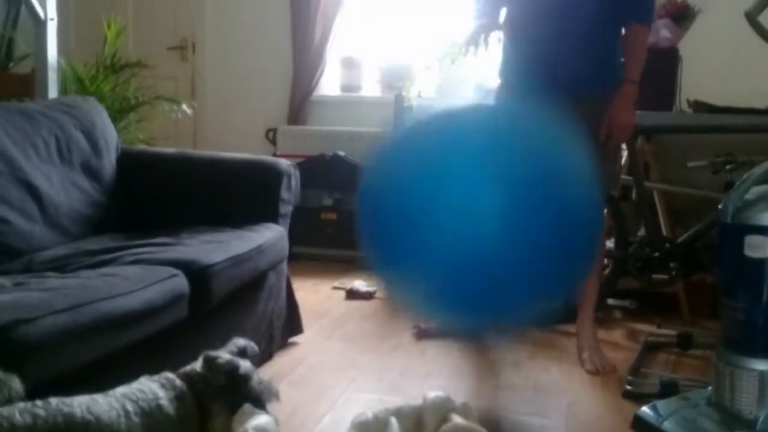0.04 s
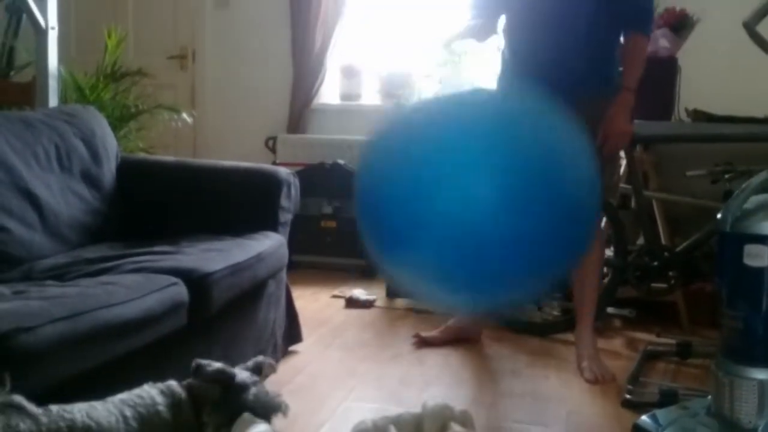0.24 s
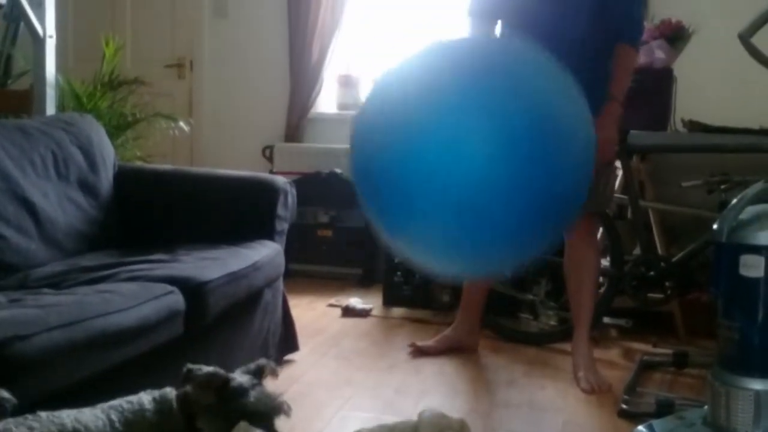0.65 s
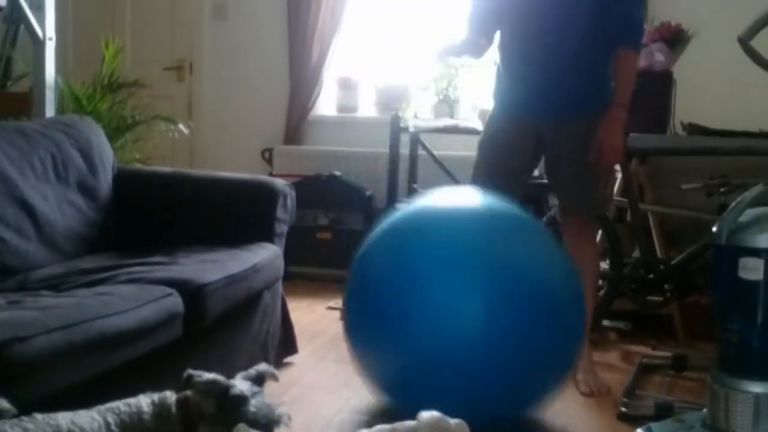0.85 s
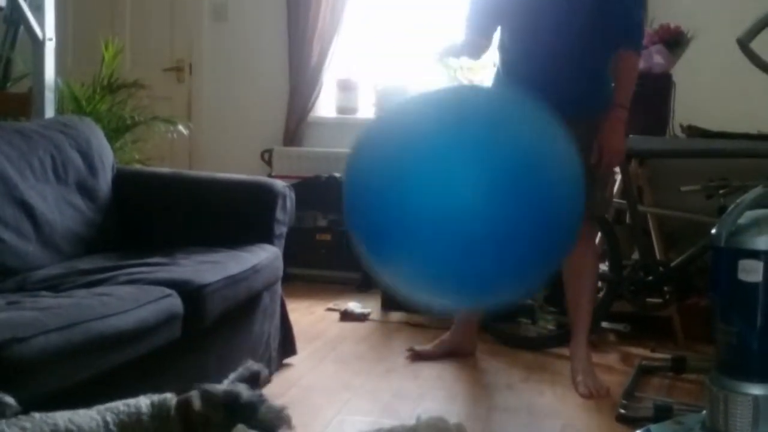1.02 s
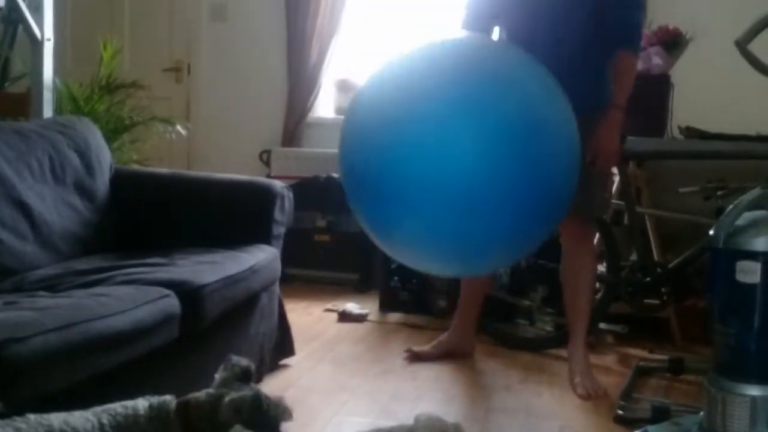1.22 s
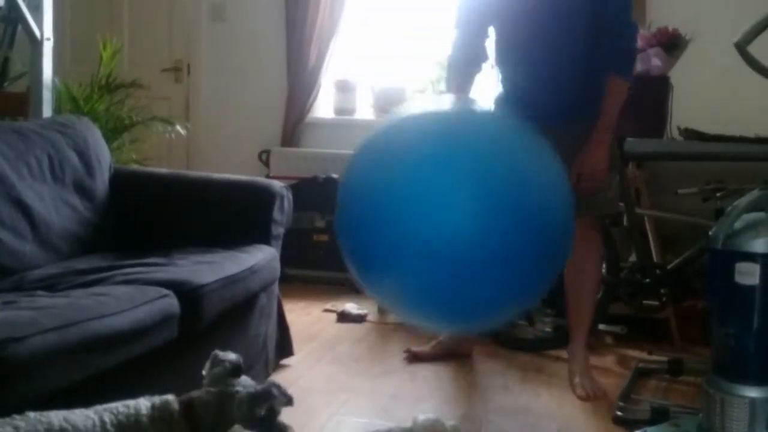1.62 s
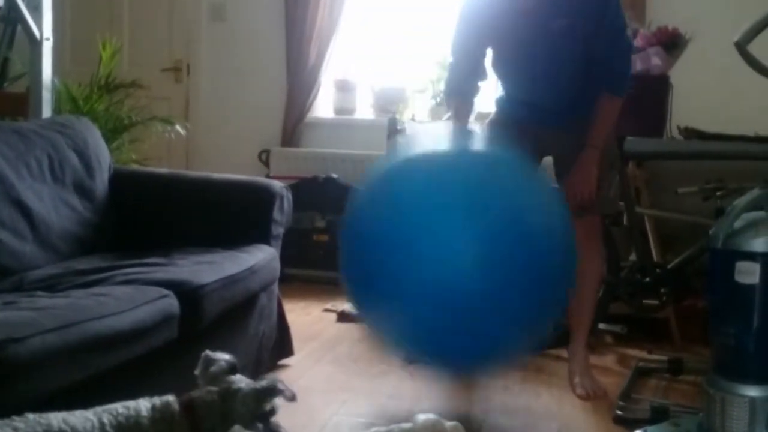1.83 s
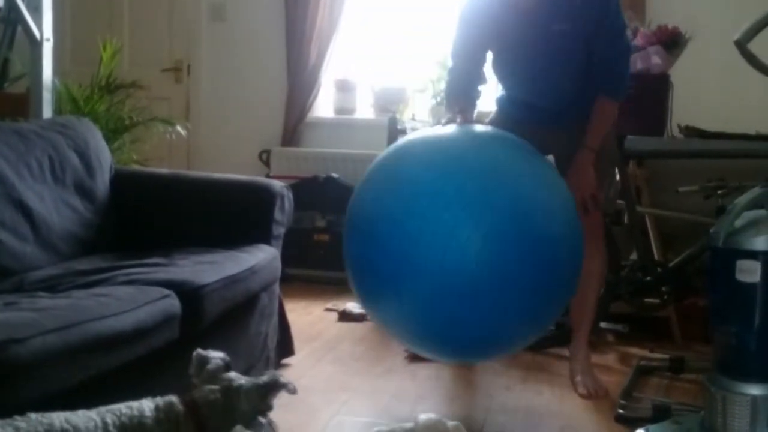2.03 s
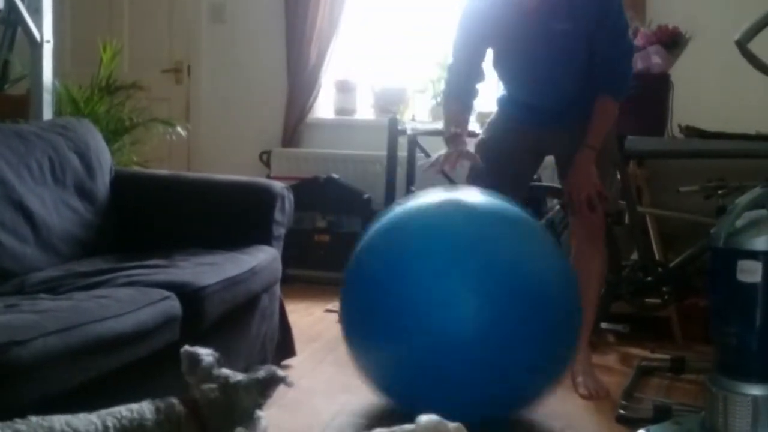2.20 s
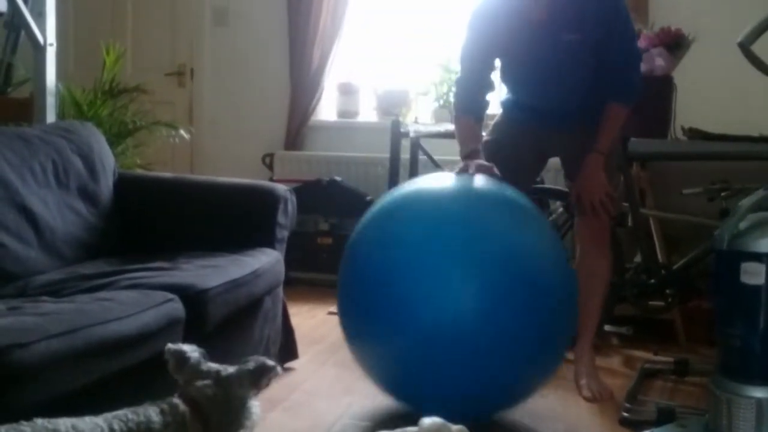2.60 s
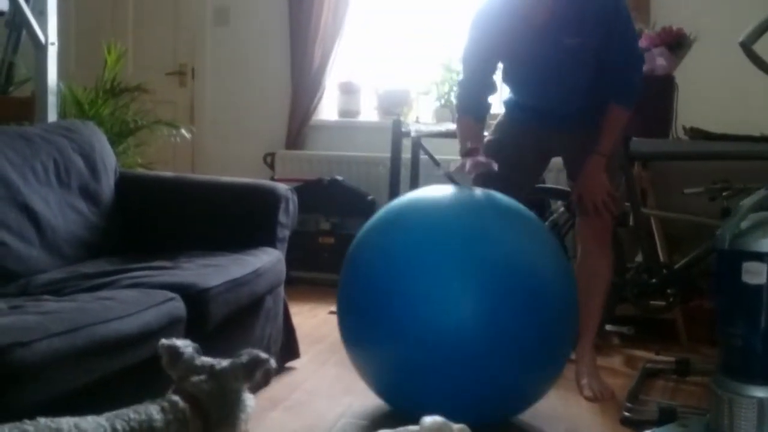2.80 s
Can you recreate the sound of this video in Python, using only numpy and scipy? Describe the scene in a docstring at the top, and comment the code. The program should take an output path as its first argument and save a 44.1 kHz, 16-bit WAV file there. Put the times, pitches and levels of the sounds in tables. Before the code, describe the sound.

A big rubber exercise ball bounces on a wooden floor, dribbled faster and faster.

```python
"""A big rubber exercise ball is dribbled on a wooden floor in a small, quiet living room.
At first an earlier bounce is still fading, with a faint rustle and a tick. Then the ball lands:
it slaps the boards, pushes a puff of air and sets the air inside it pinging. A hand pats it
back down with a duller thump, and the room answers every blow. As the dribble gets lower,
landings and pats come faster, and two more light ticks slip in near the end."""
import sys
import numpy as np
from scipy import signal
from scipy.fft import rfft, irfft
from scipy.io import wavfile

SR = 44100
rng = np.random.default_rng(int(sys.argv[2]) if len(sys.argv) > 2 else 0)


def to_wav(s):
    """Save 16-bit WAV."""
    ch = np.atleast_2d(s).T  # columns
    pcm = np.round(np.clip(ch, -1, 1) * 32767)  # PCM
    wavfile.write(sys.argv[1], SR, pcm.astype(np.int16))


N = 130095
T = np.arange(SR) / SR  # one second of time, for building single sounds


def amp(db):
    """Turns decibels into a number to multiply by."""
    return 10 ** (np.asarray(db) / 20)


def fade(fade_s):
    """Dies away by 60 dB in fade_s seconds."""
    return amp(-60 * T / fade_s)


def read(table, hz):
    """Looks up a pitch in a table, sliding between rows on a log scale."""
    pitches, values = np.transpose(table)
    return np.interp(np.log(hz + 1), np.log(pitches + 1), values)


def unit(sound):
    """Scales each channel to an energy of 1."""
    return sound / np.sqrt((sound ** 2).sum(-1, keepdims=True) + 1e-20)


def add(mix, start_s, sound):
    """Mixes a sound in; one that starts before zero leaves only its tail."""
    start = round(start_s * SR)
    sound = sound[..., max(-start, 0):]
    part = mix[:, max(start, 0):][:, :sound.shape[-1]]
    part += sound[..., :part.shape[1]]


def colour(sound, db_at, size=4096):
    """A tone control: turns each pitch up or down by db_at(hz)."""
    log_gain = np.log(amp(db_at(abs(np.fft.fftfreq(size, 1 / SR)))))
    response = np.exp(np.conj(signal.hilbert(log_gain)))  # nothing rings ahead of a blow
    taps = np.fft.ifft(response).real[:size // 2]
    return signal.fftconvolve(sound, taps[None], axes=1)[:, :sound.shape[1]]


# How alike left and right are: pitch_hz, likeness (0 to 1)
EAR_LIKENESS = [(60, 0.98), (200, .88), (500, 0.73), (1100, 0.058), (5000, 0), (14000, 0)]
def room_noise(samples):
    """Noise from all around, alike on both sides only at low pitches."""
    left, other = rfft(rng.standard_normal((2, samples)))
    likeness = read(EAR_LIKENESS, np.fft.rfftfreq(samples, 1 / SR))
    right = likeness * left + np.sqrt(1 - likeness ** 2) * other
    return irfft(np.array([left, right]), samples)


# The tone of the quiet room: pitch_hz, level_db
HUSH_TONE = [(20, 1), (40, -6.5), (70, -16.5), (130, -14), (220, -15.5), (400, -12), (600, -14),
             (1000, -13), (2000, -24.5), (3800, -24.5), (5000, -32.5), (6200, -31.5), (8000, -39.5),
             (12000, -44.5), (16000, -59.5)]
def room_hush(level_db=-65.5):
    """A faint, steady hush lies under everything."""
    spectrum = rfft(room_noise(N)) * amp(read(HUSH_TONE, np.fft.rfftfreq(N, 1 / SR)))
    return amp(level_db) * np.sqrt(N) * unit(irfft(spectrum, N))


# The tone of a hard landing: pitch_hz, level_db
SLAP_TONE = [(30, 23.5), (70, 1), (110, 12.5), (300, 12.5), (550, 10), (800, 11.5), (1800, 10), (2700, 9),
             (3500, 12), (5000, 12), (6100, 15.5), (7200, 7.5), (8200, 2.5), (10000, 0.5), (13400, -6.5),
             (14400, -17), (16200, -29.5)]
# Each landing: start_s, bass_db, middle_db, upper_middle_db, treble_db, top_db,
# crack_db, smack_db, hiss_db, hiss_s, push_db
FLOOR_HITS = [(-0.40, 3, 1, 2, 3, -1, -10, 2, -10, .1, -28),
              (0.2366, 0, 1.5, 0, 2.5, -1, -13, 1.5, -8, 0.14, -23),
              (0.957, -1.5, -3, -9.5, -5.5, -10.5, -20.5, 1, -2, 0.082, -28.5),
              (1.5824, -1.5, -6.5, -5, -8.5, -10.5, -19.5, 0, -1, 0.093, -33),
              (2.0110, -3.5, -2, -4, -11, -6, -11.5, 1.5, -1, 0.11, -28),
              (2.2968, -7.5, -6.5, -11, -17.5, -21, -11, 3, 2, 0.032, -27.5),
              (2.5536, -13.5, -13, -16, -24, -29, -12.5, 6, -18, .05, -35)]
def landings(ring):
    """The ball slaps the boards and rings; softer landings sound duller."""
    out = np.zeros((2, N))
    for start_s, *bands_db, crack_db, smack_db, hiss_db, hiss_s, push_db in FLOOR_HITS:
        hit = blow(crack_db, skin_smack(smack_db), room_db=1.5)
        hit += ring + treble_hold(hiss_db, hiss_s)
        treble_cut_db = min(bands_db[3], 0)
        # A landing with less treble also loses its very top, above 10600 Hz.
        dulling = lambda hz: 0.12 * treble_cut_db * np.maximum(hz - 10600, 0) / 1000
        hit = colour(hit, lambda hz: read(SLAP_TONE, hz) + band_gain(bands_db, hz) + dulling(hz))
        add(out, start_s, hit + air_push(push_db))
    return out


# Where bass, middle, upper middle, treble and top sit: pitch_hz
BAND_CENTRES = [250, 1100, 2600, 5000, 11000]
def band_gain(bands_db, hz):
    """Joins one hit's five band levels into a tone curve, in dB."""
    return read(list(zip(BAND_CENTRES, bands_db)), hz)


def blow(crack_db, burst, room_db, contact_s=0.00011):
    """A touch swings the air pressure up and down; a burst of noise and the echo join it."""
    from_middle = T / contact_s - 1.5
    swing = unit(-from_middle * np.exp(-from_middle ** 2 / 2))
    sharp_edge = .3 * (T == 0)
    return amp(crack_db) * (swing + sharp_edge) + burst + amp(room_db) * room_echo()


def puff(level_db, length_s):
    """Noise that swells quickly and dies away."""
    return amp(level_db) * unit(room_noise(SR) * np.sqrt(T) * np.exp(-T / length_s))


# The tone of rubber meeting wood: pitch_hz, level_db
SMACK_TONE = [(200, -9), (1500, -10.5), (2700, -7.5), (3700, 4), (4600, 3), (6000, -2), (7500, -2),
              (10000, 0.5), (15000, 1.5)]
def skin_smack(level_db):
    """The ball's skin smacks as it spreads on the boards."""
    return colour(puff(level_db, length_s=0.0031), lambda hz: read(SMACK_TONE, hz))


# How long the room rings: pitch_hz, fade_s
ECHO_FADES = [(100, .65), (300, 0.35), (800, 0.4), (2000, 0.33), (4000, 0.299), (6000, 0.25), (9000, 0.31),
              (12000, .21), (15000, .14)]
def room_echo(rise_s=.003, size=256):
    """The room answers a blow, each pitch dying at its own speed."""
    hz, t, bands = signal.stft(room_noise(SR), SR, nperseg=size)
    fade_s = read(ECHO_FADES, hz)[:, None]
    fading = bands * amp(-60 * t / fade_s) / np.sqrt(fade_s)
    tail = signal.istft(fading, SR, nperseg=size)[1][:, :SR]
    return unit(tail * (1 - np.exp(-T / rise_s)))


# The clearest notes of the air in the ball: pitch_hz, level_db, fade_s
BALL_NOTES = [(202.6, -18.5, 0.27), (249.2, -12.5, 0.44), (328.7, -11, 0.41), (406, -13, 0.69),
              (639.4, -16, 0.34), (787, -13, .7), (874, -12, .6), (969, -10, .7), (1140, -14, .7),
              (1489, -17, 1), (2043, -14.5, 0.55), (2073, -19.5, 0.3), (2656, -29.5, 0.524),
              (3403, -11, .35), (3790, -9.5, 0.16), (4340, -16, 0.11), (4800, -10.5, 0.24),
              (5540, -11, 0.1), (5840, -11, 0.21), (6220, -12, .3), (5975, -10.5, 0.29),
              (5640, -12.5, 0.22), (6000, -11, .24)]
# The tone of its crowd of faint notes: pitch_hz, level_db
SHIMMER_TONE = [(800, -5.5), (1300, 2), (1800, 4.5), (2400, 5.5), (3200, 5.5), (3900, 2), (4700, -9.5),
                (6300, -10.5), (7200, -20)]
def ball_air(clear_db=-17, shimmer_db=-17.5, faint_notes=420):
    """The trapped air rings with clear notes and a shimmer of faint high ones."""
    clear = sum(amp(db) * unit(np.sin(2 * np.pi * hz * T) * fade(fade_s))
                for hz, db, fade_s in BALL_NOTES)
    hz = rng.uniform(SHIMMER_TONE[0][0], SHIMMER_TONE[-1][0], faint_notes)
    phases = np.exp(2j * np.pi * rng.random((2, faint_notes)))
    spectrum = np.zeros((2, SR // 2 + 1), complex)  # one slot per Hz
    spectrum[:, hz.astype(int)] = amp(read(SHIMMER_TONE, hz)) * phases
    shimmer = unit(irfft(spectrum, SR) * fade(0.97))
    return amp(clear_db) * clear + amp(shimmer_db) * shimmer


# The tone of the held hiss: pitch_hz, level_db
HISS_TONE = [(500, -16.5), (2000, -10), (4500, 2.5), (5800, 2.5), (6400, -1), (8000, -5.5), (11000, -8.5),
             (13500, -11.5), (15000, -27.5)]
def treble_hold(level_db, length_s, ramp_s=.02, sag_db_per_s=85):
    """A bright hiss swells after each landing, sags, then drops away."""
    swell = 1 - np.exp(-T / ramp_s)
    drop = np.exp(-np.maximum(T - length_s, 0) / ramp_s)
    hiss = unit(room_noise(SR) * swell * amp(-sag_db_per_s * T) * drop)
    return amp(level_db) * colour(hiss, lambda hz: read(HISS_TONE, hz))


def air_push(level_db, shove_hz=14, wobble_hz=36.15):
    """The squashed ball shoves the air, then wobbles."""
    shove = np.sin(2 * np.pi * shove_hz * T) * fade(0.49) * amp([[-28], [0]])  # mostly on the right
    wobble = amp(-9.5) * np.sin(2 * np.pi * wobble_hz * T) * fade(.7)
    return amp(level_db) * (shove + wobble)


# The tone of a rustle: pitch_hz, level_db
RUSTLE_TONE = [(60, -4), (150, -3), (400, 0.5), (900, 1), (2000, -6), (4000, -11.5), (8000, -27.5),
               (15000, -45)]
# Each small movement: start_s, level_db, length_s
SHUFFLES = [(0.01, -18, .08), (1.372, -25, 0.045)]
def rustles():
    """Movement beside the ball makes faint shuffles."""
    out = np.zeros((2, N))
    for start_s, level_db, length_s in SHUFFLES:
        add(out, start_s, colour(puff(level_db, length_s), lambda hz: read(RUSTLE_TONE, hz)))
    return out


# How soft rubber dulls the top of a tick: pitch_hz, level_db
RUBBER_DULLING = [(7000, -1), (9000, -11.5), (15000, -25.5)]
# Each light touch: start_s, level_db, pitch_hz
SKIN_TOUCHES = [(0.029, -25, 4500), (2.3206, -0.5, 6640), (2.7539, -8, 3630)]
def ticks(below_db_per_octave=5, above_db_per_octave=22):
    """Light touches on the rubber make bright ticks, each strongest near its own pitch."""
    out = np.zeros((2, N))
    for start_s, level_db, pitch_hz in SKIN_TOUCHES:
        hit = blow(crack_db=-19.5, burst=puff(-0.5, length_s=0.0013), room_db=-3.5)
        octaves = lambda hz: np.log2((hz + 200) / pitch_hz)
        peak = lambda hz: np.minimum(below_db_per_octave * octaves(hz),
                                     -above_db_per_octave * octaves(hz))
        add(out, start_s, colour(hit, lambda hz: level_db + peak(hz) + read(RUBBER_DULLING, hz)))
    return out


# The tone of a firm pat: pitch_hz, level_db
PAT_TONE = [(30, 16), (70, -8), (110, 8.5), (200, 11), (300, 4.5), (400, 1.5), (500, 5), (620, -2),
            (900, -5), (2000, -7), (3700, -12), (5000, -27), (6200, -26), (8000, -34), (13500, -40),
            (15000, -46)]
# Each pat: start_s, bass_db, middle_db, upper_middle_db, treble_db, top_db, push_db
HAND_HITS = [(0.448, -10.5, -6.5, -8, -12, -30, -34), (1.206, -18.5, -12.5, -27, -33, -14.5, -46.5),
             (1.726, -4.5, 1, -6.5, 5, -1, -38.5), (1.866, -16, -9.5, -22, -9, -15, -46),
             (2.095, 4.5, 5, -7, 20.5, 2, -38), (2.391, 1, -0.5, -2, -0.5, -3, -30),
             (2.634, 5.5, 6, 0.5, 5.5, 8.5, -41), (2.820, 1.5, 1, -2, 0, -4, -36.5)]
def pats(ring, ring_db=4):
    """A soft palm thumps the rising ball and sets it ringing again."""
    out = np.zeros((2, N))
    for start_s, *bands_db, push_db in HAND_HITS:
        palm = puff(-6.5, length_s=0.029)
        hit = blow(crack_db=-22.5, burst=palm, room_db=-2) + amp(ring_db) * ring
        hit = colour(hit, lambda hz: read(PAT_TONE, hz) + band_gain(bands_db, hz))
        add(out, start_s, hit + air_push(push_db))
    return out


def scene():
    """Landings and pats ring the same ball, over the hush of the room."""
    ring = ball_air()
    return landings(ring) + pats(ring) + ticks() + rustles() + room_hush()


# How much louder the left side is than the right: pitch_hz, left_minus_right_db
SIDE_BALANCE = [(60, -2.5), (170, 1), (350, 4.5), (700, 0), (1400, 2), (2800, 4), (5500, -4.5), (9000, -3),
                (13000, -4)]
def record(dry, ceiling=.52, highest_hz=16400):
    """Gives each side its own tone, rounds off tall peaks and cuts the highest treble."""
    left = colour(dry[:1], lambda hz: read(SIDE_BALANCE, hz) / 2)
    right = colour(dry[1:], lambda hz: -read(SIDE_BALANCE, hz) / 2)
    pair = np.vstack([left, right])
    rounded = pair / (1 + (pair / ceiling) ** 4) ** .25
    treble_cut = signal.firwin(255, highest_hz, window=("kaiser", 9), fs=SR)
    return signal.oaconvolve(rounded, treble_cut[None], "same")


dry = scene()
out = record(dry)
to_wav(out)
```